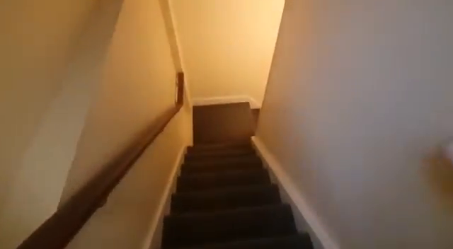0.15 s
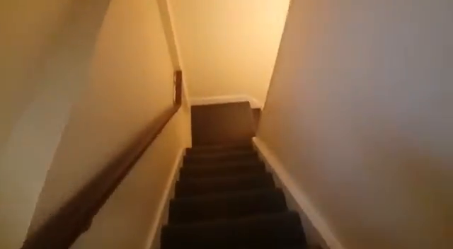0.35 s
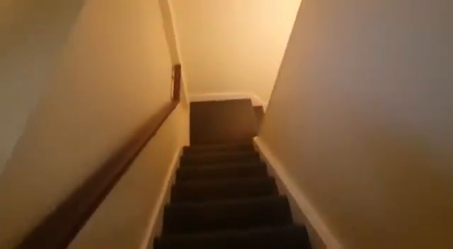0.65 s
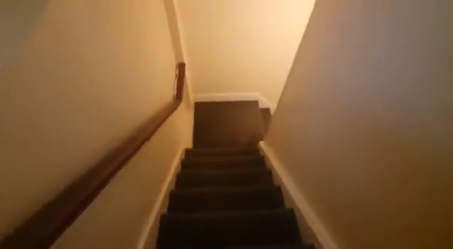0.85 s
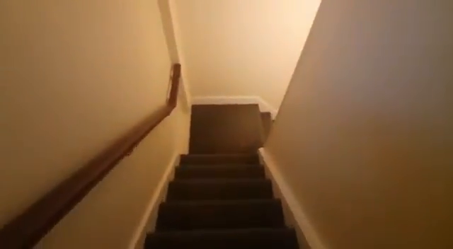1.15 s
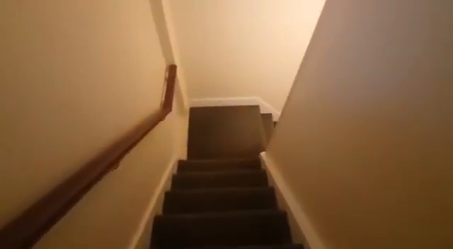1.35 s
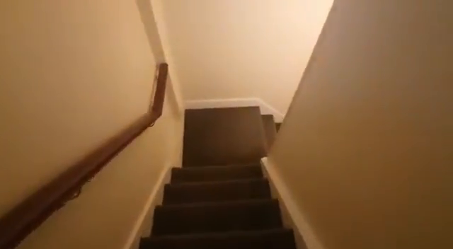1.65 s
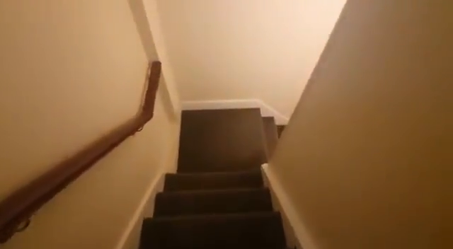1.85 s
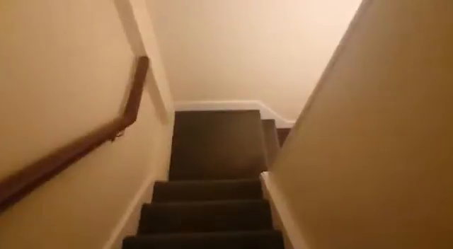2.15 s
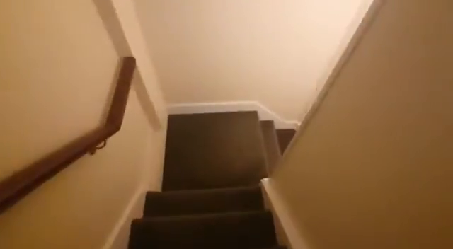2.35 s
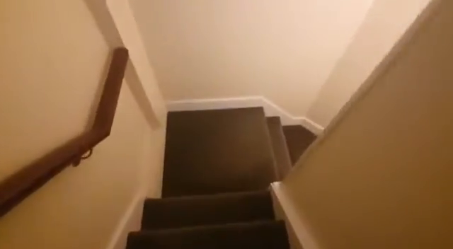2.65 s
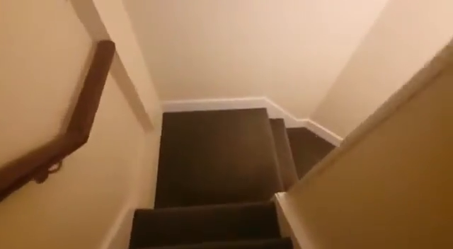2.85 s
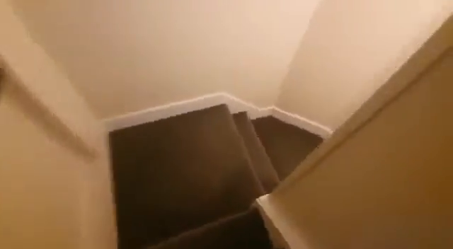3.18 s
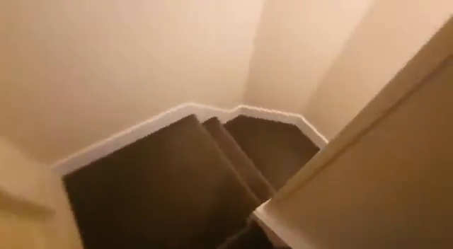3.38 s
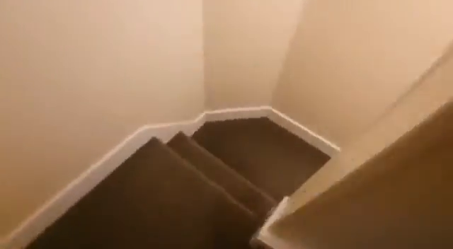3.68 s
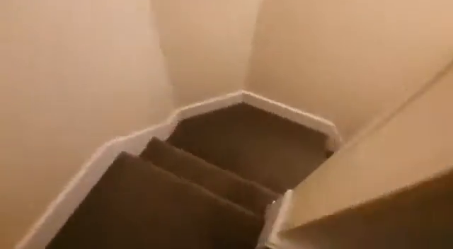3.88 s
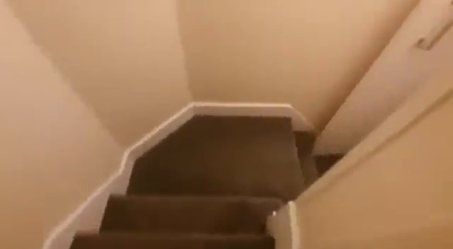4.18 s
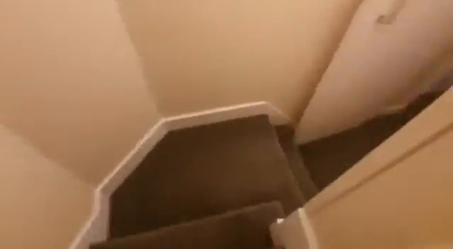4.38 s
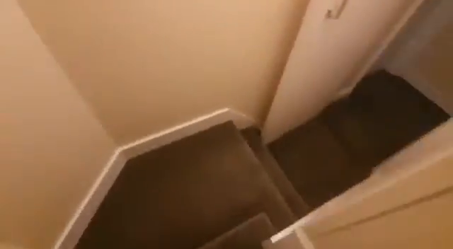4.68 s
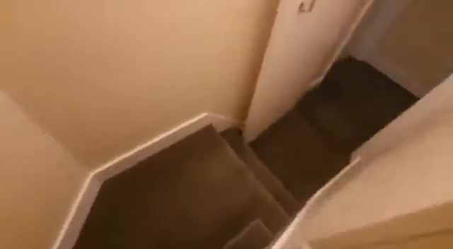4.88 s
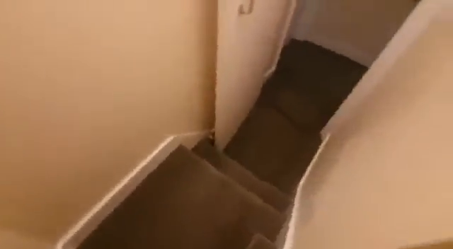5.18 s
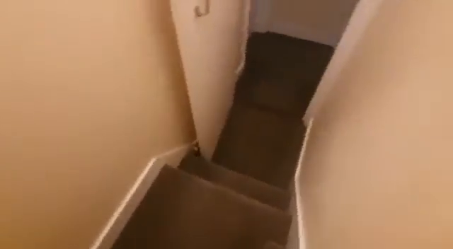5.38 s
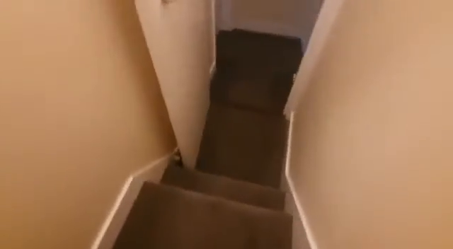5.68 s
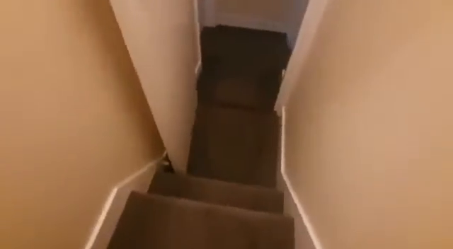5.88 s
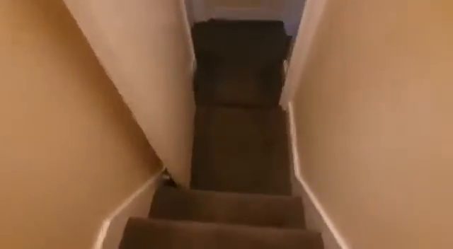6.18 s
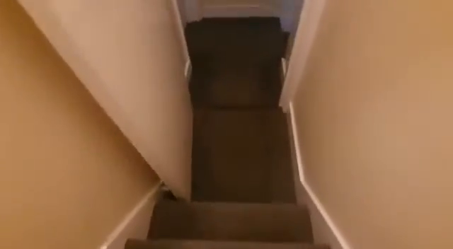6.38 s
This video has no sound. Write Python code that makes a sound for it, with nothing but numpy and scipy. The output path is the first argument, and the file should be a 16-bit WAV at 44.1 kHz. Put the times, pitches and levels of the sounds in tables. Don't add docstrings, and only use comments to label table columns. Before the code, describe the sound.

Someone walks down carpeted wooden stairs in a narrow, hard-walled stairwell, carrying a small stereo microphone. Two heavy low thuds open, then softer dull steps with brushing pile and swishing trousers. Halfway, a sharp bright crack and scuff mark the turn; then heavier heels boom, boards tick and creak, over faint hum and deep room tone.

```python
import sys
import numpy as np
from scipy import signal
from scipy.io import wavfile

SR = 44100
rng = np.random.default_rng(int(sys.argv[2]) if len(sys.argv) > 2 else 0)


def magnitude_from_level(level_db):
    exponent = np.asarray(level_db, float) / 20
    return 10 ** exponent


def dump(signal):
    limited = np.clip(np.atleast_2d(signal).T, -1, 1)
    pcm = np.round(limited * 32767).astype(np.int16)
    wavfile.write(sys.argv[1], SR, pcm)


N = 288382


def rms_one(x):
    return x / np.sqrt(np.mean(x ** 2) + 1e-20)


def in_time(rows):
    s, *columns = np.transpose(rows)
    return [np.interp(np.arange(N) / SR, s, c) for c in columns]


def at_hz(points, hz):
    table = np.array(points)
    return np.interp(np.log(hz), np.log(table[:, 0]), table[:, 1])


def drift(rate):
    r = np.exp(-80 * np.pi * rate / SR)
    noise = rng.standard_normal(N // 40 + 2002)
    slow = signal.lfilter([1], [1, -2 * r, r * r], noise)[2000:]
    return np.interp(np.arange(N) / 40, np.arange(len(slow)), rms_one(slow))


def full(coarse):
    return np.interp(np.arange(N) / 64, np.arange(len(coarse)), coarse)


def swells(s, peak_db, rise_s, fall_s, roundness=0.97):
    late = np.arange(N // 64 + 2) * 64 / SR - np.c_[s]
    span = np.maximum(np.where(late < 0, np.c_[rise_s], np.c_[fall_s]), 0.005)
    return magnitude_from_level(np.maximum(np.c_[peak_db] - 20 * np.abs(late / span) ** roundness, -300))


def ring(x, hz, width_hz):
    r, w = np.exp(-np.pi * width_hz / SR), 2 * np.pi * hz / SR
    return signal.lfilter([0, np.sin(w)], [1, -2 * r * np.cos(w), r * r], x + 1e-18)


# f/Hz, likeness (1 = the same)
LIKENESS = [(60, 0.99), (160, 0.95), (350, 0.83), (700, 0.48), (1400, 0.0053), (8000, 0.011)]
# f/Hz, level/dB (left minus right)
LEAN = [(60, 0.0), (110, 1.5), (200, -2.5), (380, -0.5), (700, 1), (1290, -0.8), (2380, -4.4), (4400, -1.2),
        (8120, 1.3), (15000, -3)]


def pair(mid, side, hz):
    alike = np.clip(at_hz(LIKENESS, hz), 0, 1)
    lean = magnitude_from_level(at_hz(LEAN, hz) / 2 * np.array([[1], [-1]]))
    return lean * (np.sqrt(1 + alike) * mid + np.sqrt(1 - alike) * side * [[1], [-1]])


def fibres(spectrum, grain_db, patchy_db):
    out = 0
    edges = 22 * 2 ** np.arange(0, 9.7, 1 / 3)
    slips = rng.standard_normal((2, 2, N)) * magnitude_from_level(grain_db * drift(183))
    for k, (low, high) in enumerate(zip(edges, edges[1:])):
        hz = np.sqrt(low * high)
        if spectrum[0][0] < hz < spectrum[-1][0] * 1.1:
            band = signal.butter(2, [low, high], "band", fs=SR, output="sos")
            mid, side = signal.sosfilt(band, slips[k % 2])
            height = magnitude_from_level(at_hz(spectrum, hz) + patchy_db * drift(7.2))
            out = out + height * pair(mid, side, hz)
    return rms_one(out)


# f/Hz, level/dB (per Hz)
ROOM_COLOUR = [(13, -37), (22, -18), (47, 5), (66, 5.5), (84, -8), (142, -28), (203, -17.5), (290, -15.5),
               (414, -34.5), (1460, -32), (2680, -34), (6620, -35), (8240, -47), (11800, -50), (15500, -76)]


def room_tone():
    return magnitude_from_level(-49) * fibres(ROOM_COLOUR, grain_db=-3.5, patchy_db=1.4)


# t/s, level/dB, length/s, f/Hz
HUM = [(0.2, -44.5, 0.3, 100.7), (1.4, -50, 0.49, 100.6), (1.9, -52.5, 0.56, 100.4),
       (3.53, -49.5, 0.5, 100), (4.33, -53, 0.92, 100.4), (5.39, -55.5, 0.81, 100.5),
       (6.04, -62, 0.37, 100.5), (0.22, -38.5, 0.25, 159.3), (1.95, -61.5, 0.6, 159.1),
       (2.9, -58, 0.84, 159.3), (4.83, -60, 0.44, 159.1), (5.45, -56.5, 0.54, 159.7),
       (6.04, -61, 0.31, 157.6), (0.5, -75, 0.62, 196), (1.31, -60, 0.55, 195.7),
       (1.86, -61.5, 0.48, 194.5), (3.35, -60, .9, 194), (6.04, -60, 0.36, 193), (0.22, -53.5, 0.38, 312.8),
       (0.597, -64.5, 1, 312.8), (1.297, -62, 0.51, 313.4), (1.84, -67, 0.44, 312.8),
       (3.53, -65.5, 1, 313.6), (4.33, -71.5, 0.64, 312.6), (5.39, -67.5, 0.62, 313.3)]


def hum():
    out = 0
    waver, flicker, apart = drift(6.34), drift(3.0), drift(1.3)
    for s, peak_db, length, hz in HUM:
        near = slice(max(round((s - 2 * length) * SR), 0), round((s + 2 * length) * SR))
        own_waver = np.roll(waver, round(hz) * 97)[near]
        phase = 2 * np.pi * np.cumsum(hz * (1 + 0.012 * own_waver)) / SR
        height = full(swells(s, peak_db + 3.5, length, length)[0]) * magnitude_from_level(1.0 * flicker)
        wave = np.zeros(N)
        wave[near] = height[near] * np.sin(phase)
        out = out + pair(wave, wave * apart, hz)
    return out


# t/s, level/dB, length/s, f/Hz, width/Hz
CREAKS = [(0.041, -48, 0.028, 790, 280), (0.303, -50, 0.13, 367, 95), (0.27, -41, .12, 151, 28),
          (1.13, -57, 0.06, 107, 16), (1.318, -62, 0.11, 450, 110), (1.821, -57, 0.14, 220, 30),
          (2.246, -60, 0.21, 796, 410), (2.8, -54.5, 0.17, 188.7, 37), (3.052, -67, 0.088, 686, 74),
          (3.327, -46, 0.036, 3086, 1530), (3.353, -47.5, 0.064, 2575, 950), (3.321, -49, 0.04, 4260, 1000),
          (4.104, -53, 0.045, 523, 310), (4.246, -53.5, 0.073, 348, 60), (4.459, -62, 0.13, 1754, 370),
          (4.504, -62, 0.034, 850, 65), (4.588, -61, 0.088, 1745, 390), (4.744, -63, 0.068, 690, 190),
          (5.43, -54.5, .06, 5704, 2000), (5.517, -57.5, 0.097, 274, 31), (5.649, -63.5, 0.079, 767, 105),
          (5.769, -61.5, 0.088, 1950, 57), (5.838, -66, .08, 2478, 150), (5.89, -52, 0.045, 381, 150),
          (5.953, -56, 0.046, 600, 280), (6.29, -65, 0.14, 1733, 150), (6.333, -60, .04, 2707, 640),
          (6.429, -55.5, 0.044, 1747, 180), (0.067, -48.5, 0.049, 554, 280), (0.332, -47, 0.064, 266, 53),
          (1.37, -62, 0.073, 523, 73), (2.893, -62, 0.068, 522, 98), (3.152, -59.5, 0.084, 465, 95),
          (3.681, -54.5, 0.14, 253.5, 69), (4.481, -65, 0.18, 648, 83), (4.317, -56, 0.052, 1300, 670),
          (6.241, -56.5, 0.054, 151, 27), (1.387, -54, 0.04, 1400, 900), (5.425, -60, 0.071, 560, 470),
          (6.5, -58.5, 0.07, 1207, 440), (4.521, -54, 0.078, 327, 93), (5.301, -48.5, 0.061, 410, 110),
          (3.448, -60, 0.22, 6500, 990)]
# t/s,
# level/dB, length/s, f/Hz, width/Hz
MORE_CREAKS = [(4.892, -64.5, .035, 14560, 900), (0.19, -54.5, .16, 12700, 4200),
               (4.62, -65, 0.091, 6800, 2300), (1.835, -55, 0.077, 3300, 600), (1.74, -63, .08, 2980, 500),
               (1.46, -65, .1, 3000, 500), (1.395, -56.5, 0.034, 2000, 530), (1.25, -65, .06, 5100, 250),
               (0.3, -58, 0.14, 6800, 700), (4.27, -50.5, 0.078, 280.5, 80), (4.255, -52.5, .05, 2610, 600),
               (4.5, -59, 0.037, 680, 390), (6.045, -45.5, .045, 420, 300), (5.91, -48, 0.061, 152, 30),
               (5.42, -51, 0.065, 800, 420), (0.05, -47.5, 0.032, 546, 220), (1.5, -66, 0.17, 372, 56),
               (0.62, -69, 0.12, 3500, 630)]


def creaks():
    out = np.zeros((2, N + SR))
    t = np.arange(SR // 2) / SR - 1 / 4
    for s, peak_db, length, hz, width_hz in CREAKS + MORE_CREAKS:
        noise = rng.standard_normal((2, len(t)))
        mid, side = (rms_one(ring(ring(x, hz, width_hz), hz, width_hz)) for x in noise)
        height = magnitude_from_level(peak_db - 20 * np.abs(t / max(length, 1 / 30)) ** 1.3)
        start = round((s + 1 / 4) * SR)
        out[:, start:start + len(t)] += height * pair(mid, side, hz)
    return out[:, SR // 2:SR // 2 + N]


# t/s, level/dB, f/Hz, pan/dB, crack/dB
TICKS = [(0.034, -41, 900, -2, -18), (0.042, -42, 824, 0, -18), (0.048, -42, 900, 0, -16),
         (0.312, -43, 870, -1.5, -6), (3.309, -31, 3010, -1, 11), (3.3105, -36, 3100, -1, -30),
         (4.296, -35, 2680, -5, -32), (4.299, -41, 2650, -5, -30), (4.311, -36.5, 1150, -2, -22),
         (4.701, -50, 2550, -2, -25), (6.0205, -36, 640, 3, -25), (6.025, -42, 560, 0, -25),
         (6.178, -41, 570, -2, -3), (6.178, -52, 1650, -2, -20), (6.416, -39.5, 3560, -8, -15),
         (6.416, -45, 2800, -6, -20), (6.424, -43, 3580, -8, -14)]
# t/s, level/dB, f/Hz, pan/dB, crack/dB
KNOCKS = [
    (0.036, -34, 560, 0, -30),
    (3.263, -32, 548, 0, -20),
    (4.296, -37, 1300, -3, -30),
    (4.297, -43, 800, -2, -30),
    (4.311, -41.5, 2600, -3, -30),
    (4.311, -40, 685, -2, -30),
    (4.311, -45, 1800, -2, -30),
    (5.274, -39, 500, 1, -25),
    (5.329, -35, 479, -1, -20),
    (6.416, -41, 1856, -8, -20),
]
# t/s, level/dB, f/Hz,
# pan/dB, crack/dB
GRIT = [(0.034, -45, 3400, 0, -30), (0.047, -42, 1650, 0, -30), (0.313, -43, 3100, 0, -30),
        (0.255, -45, 2050, 0, -30), (3.3135, -38, 2350, 0, -30), (3.313, -41, 4300, 0, -30),
        (3.327, -36, 2950, -1, -30), (3.332, -39, 3800, -1, -30), (3.333, -38, 2700, 0, -30),
        (3.354, -41, 3300, 0, -30), (3.3605, -41, 2900, -1, -30), (6.03, -43, 1300, 0, -30),
        (6.046, -43, 2600, 0, -30), (6.062, -45, 2600, 0, -30), (6.058, -48, 3600, 0, -30),
        (6.052, -44, 1150, 0, -30), (4.5195, -57, 10200, 0, -30), (4.521, -59, 9000, 0, -30)]
# t/s, level/dB, f/Hz, pan/dB, crack/dB
PING = [
    (4.8723, -50, 14330, -12, -30),
]
TICK_T60_S, KNOCK_T60_S, PING_T60_S = 0.011, 0.008, 0.016


def ticks():
    out = np.zeros((2, N + 4096))
    bright = signal.butter(5, [2600, 6600], "band", fs=SR, output="sos")
    kinds = [(TICKS, TICK_T60_S), (KNOCKS, KNOCK_T60_S), (GRIT, KNOCK_T60_S), (PING, PING_T60_S)]
    for rows, t60 in kinds:
        width_hz = np.log(1000) / np.pi / t60
        for s, peak_db, hz, pan_db, crack_db in rows:
            click = np.zeros(4096)
            click[0] = magnitude_from_level(peak_db)
            body = ring(ring(click, hz, width_hz), hz, 1660) * np.pi * 2500 / SR * 2
            crack = signal.sosfilt(bright, click) * magnitude_from_level(crack_db + 14.0)
            start = round((s + 0.0007) * SR)
            out[:, start:start + len(click)] += (body + crack) * magnitude_from_level([[pan_db / 2], [-pan_db / 2]])
    return out[:, :N]


STAIRWELL_T60_S, WALL_CUT_HZ = 0.32, 5500


def stairwell(x):
    t = np.arange(round(0.4 * SR)) / SR
    cloud = rng.standard_normal((2, len(t))) * magnitude_from_level(-60 * t / STAIRWELL_T60_S) * (t > 0.003)
    cloud = cloud / np.sqrt(np.sum(cloud ** 2) / 2)
    cloud = signal.lfilter(*signal.butter(2, WALL_CUT_HZ, fs=SR), cloud)
    return signal.fftconvolve(x, cloud, axes=1)[:, :N]


# t/s, level/dB, t60/s
SCUFFS = [
    (0.034, -32, 0.23),
    (0.312, -30, 0.17),
    (1.378, -43, 0.19),
    (1.6939, -39, 0.13),
    (3.31, -23, 0.17),
    (4.086, -54, 0.12),
    (4.7011, -37, 0.17),
    (5.272, -46, 0.32),
    (6.019, -41, 0.23),
    (6.179, -41, 0.23),
]


def landings():
    out = np.zeros(N)
    for s, peak_db, t60 in SCUFFS:
        t = np.arange(N - round(s * SR)) / SR
        out[N - len(t):] += magnitude_from_level(peak_db - 13 - 60 * t / t60)
    return out


# t/s, sole level/dB, cloth level/dB, length/s
STRIDES = [(0.0, -43.5, -49.5, 0.03), (0.195, -57.5, -50.5, 0.27), (0.294, -49.5, -45.5, 0.22),
           (0.856, -47, -47, 0.078), (1.384, -50, -50, 0.11), (1.71, -64, -58.5, 0.098),
           (1.833, -49, -49, 0.18), (2.265, -51.5, -54, 0.14), (2.328, -45.5, -49, 0.12),
           (2.811, -47, -46, 0.17), (3.175, -52, -54, 0.14), (3.308, -49, -45, 0.18),
           (3.746, -49.5, -49.5, 0.14), (3.933, -58, -61.5, 0.15), (4.17, -52, -68, 0.16),
           (4.244, -46, -49.5, 0.1), (4.323, -49, -62, 0.053), (4.441, -58, -61.5, 0.16),
           (4.612, -56, -64, 0.11), (4.759, -53, -53.5, 0.087), (5.329, -46, -64.5, 0.17),
           (5.385, -46, -53.5, 0.11), (5.422, -43.5, -49, 0.11), (5.629, -57.5, -58.5, 0.2),
           (5.932, -51.5, -68, 0.21), (6.06, -48.5, -51.5, 0.14), (6.327, -54, -70, 0.29),
           (6.42, -51, -58, 0.05), (6.55, -46, -61, 0.1)]
# t/s, drag level/dB, swing level/dB
SWING = [(0.0, -58, -67), (0.3, -56, -58), (0.5, -64, -58), (0.8, -54.5, -51), (1.0, -57, -57),
         (1.2, -57, -64), (1.55, -60, -62.5), (1.9, -57, -57), (2.6, -55.5, -58.5), (3.0, -58.5, -53),
         (3.601, -56, -57), (3.9, -61, -70), (4.8, -57.5, -66.5), (4.949, -68.5, -73), (5.2, -72, -70.5),
         (5.5, -56, -59.5), (5.8, -61.5, -75), (6.15, -62, -62)]
STRIDE_RISE, STRIDE_FALL = 1.15, 1


def rubbing():
    s, *peaks, length = np.transpose(STRIDES)
    heights = []
    for db, between_db in zip(peaks, in_time(SWING)):
        strides = full(swells(s, db, STRIDE_RISE * length, STRIDE_FALL * length).max(0))
        heights.append(np.hypot(strides, magnitude_from_level(between_db)))
    return heights


# f/Hz, level/dB (per Hz)
CLOTH_COLOUR = [(2350, -8), (4000, -1.5), (5430, -4.5), (6590, 0), (7980, -8.5), (10200, -8.5), (12000, -4),
                (13900, -3.5), (15500, -9)]


def trouser_legs(height):
    return magnitude_from_level(2.5) * height * fibres(CLOTH_COLOUR, grain_db=0.63, patchy_db=0.95)


# f/Hz, level/dB (per Hz)
PILE_COLOUR = [(410, 1.5), (700, -2), (1460, -1.5), (2530, -2), (2910, 1), (3570, -8), (3900, -9.5),
               (5500, -14), (7150, -29), (12100, -120)]


def soles(height, landed):
    return (magnitude_from_level(0.5) * height + landed) * fibres(PILE_COLOUR, grain_db=1.0, patchy_db=1.5)


# t/s, then the reply of the low, middle and upper wood level/dB
WEIGHT = [(0.07, -39, -35, -44), (0.16, -38, -39, -45.5), (0.25, -50, -35, -43), (0.31, -45, -41, -46.5),
          (0.379, -51, -37.5, -56), (0.63, -44.5, -48, -54.5), (0.72, -42, -44, -50.5),
          (0.82, -41, -50.5, -57), (0.88, -45, -46, -50.5), (1.2, -49, -57, -59), (1.355, -43, -48.5, -49),
          (1.7, -57, -47, -49.5), (1.88, -56, -55, -51), (2.33, -49, -45.5, -48.5), (2.67, -52, -51, -49),
          (2.79, -51, -46, -49.5), (3.262, -37, -43.5, -44), (3.35, -39, -48, -47.5), (3.55, -40, -60, -53),
          (3.68, -38.5, -48, -50.5), (3.8, -45.5, -51, -54), (4.125, -32.5, -58, -54.5),
          (4.26, -42, -43, -54), (4.52, -40, -55.5, -52), (4.73, -47, -51, -61), (5.33, -43.5, -48, -43),
          (5.39, -35.5, -59, -43), (5.97, -40, -58, -48), (6.04, -40, -40.5, -47.5),
          (6.5, -44.5, -40.5, -48)]
# rise/s, fall/s, level/dB
TREAD_REPLY = [(0.075, 0.11, -53), (0.098, 0.14, -67.5), (0.124, 0.21, -59.5)]
REST_FOLLOWS_DRAG = 0.82


def weight():
    s, *replies = np.transpose(WEIGHT)
    quiet_db = REST_FOLLOWS_DRAG * (in_time(SWING)[0] + 60)
    heights = []
    for db, (rise, fall, rest_db) in zip(replies, TREAD_REPLY):
        shifts = full(swells(s, db, rise, fall).max(0))
        heights.append(np.maximum(shifts, magnitude_from_level(rest_db + quiet_db)))
    return heights


def treads(modes, height):
    out = 0
    for hz, width_hz, mode_db in modes:
        mid, side = (rms_one(ring(x, hz, width_hz)) for x in rng.standard_normal((2, N)))
        out = out + magnitude_from_level(mode_db + 3.4 * drift(2.8)) * pair(mid, side, hz)
    return height * rms_one(out)


# f/Hz, width/Hz, level/dB
LOW_MODES = [(98.5, 4.5, -5), (101, 75, -8.5)]
MIDDLE_MODES = [(145, 10, -9.5), (155.5, 4.8, -1.5), (187.3, 9.6, -6), (200.2, 12, -6), (225, 10, -7)]
UPPER_MODES = [(275.3, 24, 0.5), (310.5, 16.4, -2.5), (381, 28, -1.5), (450, 124, 0.5), (683, 280, -2.5),
               (784, 160, -3.5)]


def staircase(landed):
    low, middle, upper = weight()
    wood = magnitude_from_level(-3.5) * treads(LOW_MODES, low)
    wood = wood + magnitude_from_level(-2.5) * treads(MIDDLE_MODES, middle)
    return wood + magnitude_from_level(-2.0) * treads(UPPER_MODES, upper + magnitude_from_level(-5.5) * landed)


# t/s, level/dB, f/Hz, t60/s
BLOWS = [(0.232, -20, 105, 0.19), (0.28, -24, 116, 0.088), (3.27, -35, 165.5, 0.082),
         (3.618, -35, 90.4, 0.14), (4.086, -25, 103.2, 0.26), (4.248, -25.5, 91.8, 0.083),
         (4.707, -31, 92.6, 0.31), (5.274, -34.5, 125.7, 0.12), (5.429, -37, 94.9, 0.16),
         (5.879, -32, 94.9, 0.12), (6.016, -26.5, 214.2, 0.18), (6.049, -18.5, 96.3, 0.066),
         (6.487, -34.5, 213, 0.15)]
# t/s, level/dB, f/Hz, t60/s
DEEP_BLOWS = [
    (5.868, -28.5, 73.4, 0.24),
    (6.097, -25, 84.8, 0.16),
]
# t/s, level/dB, f/Hz, t60/s
MORE_BLOWS = [
    (0.299, -31.5, 207.5, 0.41),
    (3.336, -37.5, 173, 0.26),
    (4.088, -31.5, 161, 0.24),
]


def blows():
    out = np.zeros(N)
    for s, peak_db, hz, t60 in BLOWS + DEEP_BLOWS + MORE_BLOWS:
        start = round(s * SR)
        t = np.arange(min(N - start, SR // 2)) / SR
        height = magnitude_from_level(peak_db - 2.0 - 60 * t / t60) * (1 - np.exp(-t / 0.0046))
        out[start:start + len(t)] += height * np.sin(2 * np.pi * hz * t)
    return out


# t/s, level/dB, length/s, f/Hz
FLIGHT_BOOMS = [(0.009, -27, 0.088, 74.3), (0.119, -27, 0.13, 70.4), (0.268, -37.5, 0.07, 69.6),
                (0.4, -38, 0.045, 57.9), (0.565, -41, 0.055, 56.4), (0.68, -56, 0.097, 65),
                (0.794, -45, 0.25, 66), (0.942, -43, 0.075, 66.9), (1.103, -41.5, 0.074, 67.7),
                (1.246, -40.5, 0.095, 65.8), (1.341, -43, 0.054, 55), (1.431, -42, 0.062, 66.5),
                (1.729, -39, 0.18, 55.53), (1.872, -38, 0.25, 51.6), (1.997, -36.5, 0.1, 49.6),
                (2.223, -38, 0.07, 50.95), (2.415, -47, 0.071, 64), (2.535, -48, 0.19, 70.9),
                (2.655, -41.5, 0.056, 78.7), (2.878, -41.5, 0.1, 77.3), (2.988, -43, 0.097, 82.3),
                (3.16, -47, 0.055, 81.9)]
# t/s, level/dB, length/s, f/Hz
TURN_BOOMS = [(3.252, -43.5, 0.079, 63), (3.356, -37, 0.066, 64.2), (3.549, -46, 0.041, 59.9),
              (3.646, -34, 0.055, 68.9), (3.763, -45, 0.093, 62.4), (3.896, -42, 0.097, 57.17),
              (4.112, -33.5, 0.029, 64.26), (4.171, -29, 0.054, 69.1), (4.363, -46, 0.34, 43.34),
              (4.636, -41, 0.3, 44.03), (4.891, -45.5, 0.13, 44.54), (5.076, -42, 0.038, 54),
              (5.21, -44.5, 0.1, 59.4), (5.339, -44.5, .12, 59.7), (5.433, -37, 0.042, 57.1),
              (5.509, -40.5, 0.036, 53.75), (5.576, -39.5, 0.049, 48.3), (5.733, -49, 0.13, 54.15),
              (5.89, -31, 0.022, 56.3), (5.918, -30, 0.018, 55.9), (5.96, -40, 0.029, 55),
              (6.052, -32.5, 0.066, 49.37), (6.204, -40, 0.074, 47.55), (6.37, -45, 0.17, 49.75),
              (6.54, -38.5, 0.11, 44.1)]
BOOM_RISE = 0.898
BOOM_ROUNDNESS = 1.7


def boom():
    s, peak_db, length, pitch_hz = np.transpose(FLIGHT_BOOMS + TURN_BOOMS)
    heights = swells(s, peak_db, BOOM_RISE * length, length, BOOM_ROUNDNESS)
    hz = full(pitch_hz @ heights / heights.sum(0))
    phase = 2 * np.pi * np.cumsum(hz * (1 + 0.015 * drift(5.7))) / SR
    height = np.sqrt(2) * full(np.sqrt(np.sum(heights ** 2, 0))) * magnitude_from_level(0.23 * drift(40))
    wave = height * (np.sin(phase) - 3.5 * height * np.cos(2 * phase))
    return wave * (1 + 0.02 * np.array([drift(7.9), drift(5)]))


def scene():
    sole_height, cloth_height = rubbing()
    landed = landings()
    snaps = ticks()
    background = room_tone() + hum()
    boards = creaks() + snaps + magnitude_from_level(-8) * stairwell(snaps)
    brushing = trouser_legs(cloth_height) + soles(sole_height, landed)
    footfalls = staircase(landed) + blows() + boom()
    return background + boards + brushing + footfalls


def band_limit(x):
    return signal.sosfilt(signal.butter(12, 15765, fs=SR, output="sos"), x)


def record(dry):
    return band_limit(dry)


dry = scene()
out = record(dry)
dump(out)
```